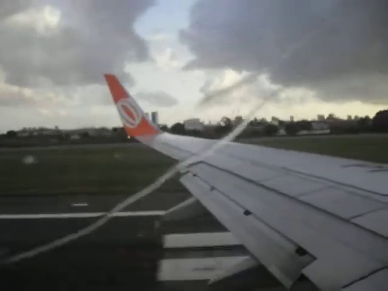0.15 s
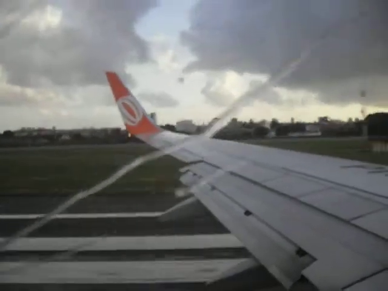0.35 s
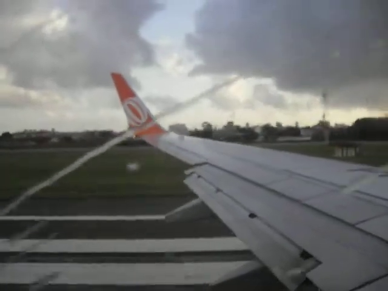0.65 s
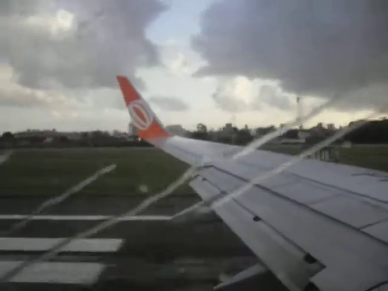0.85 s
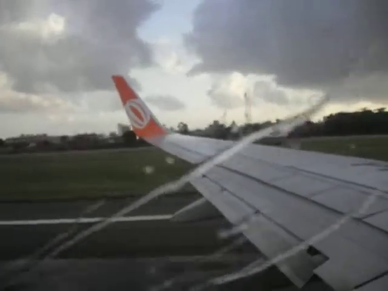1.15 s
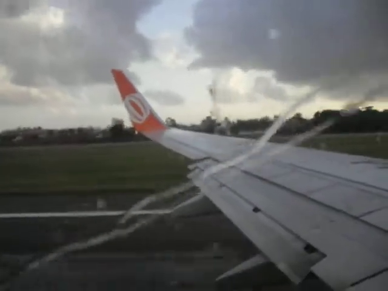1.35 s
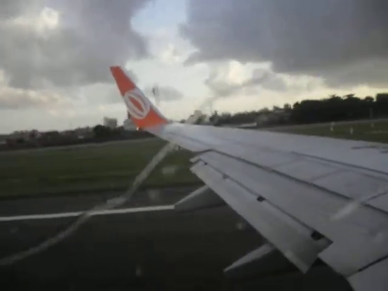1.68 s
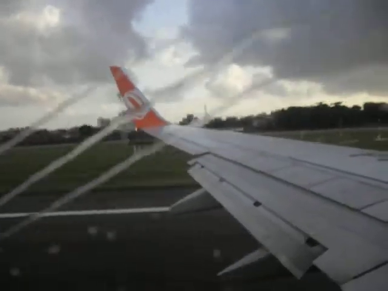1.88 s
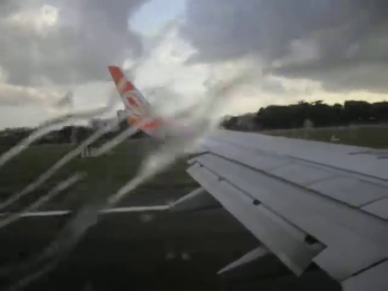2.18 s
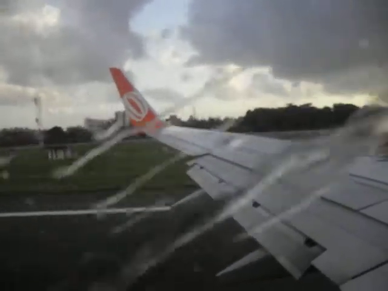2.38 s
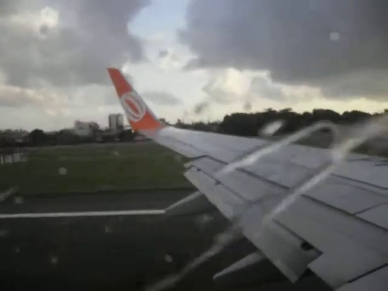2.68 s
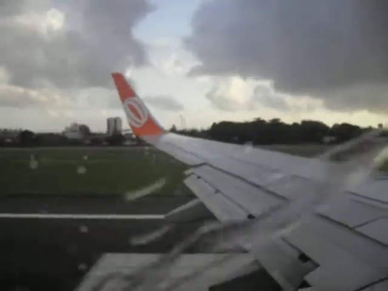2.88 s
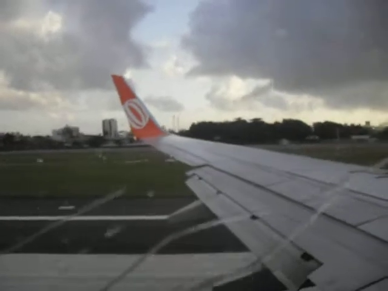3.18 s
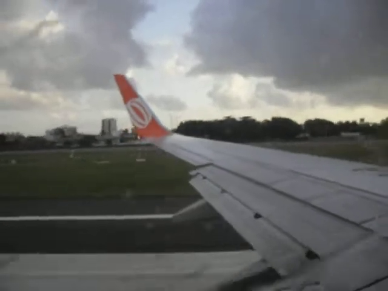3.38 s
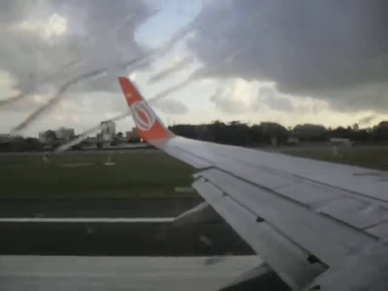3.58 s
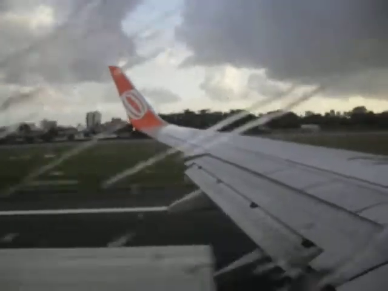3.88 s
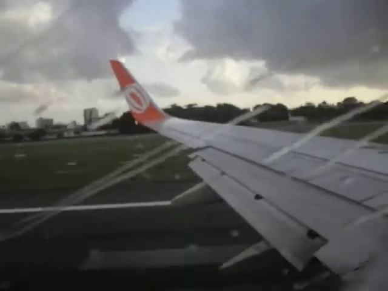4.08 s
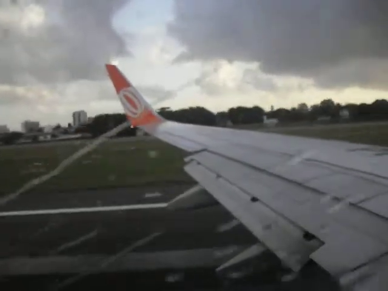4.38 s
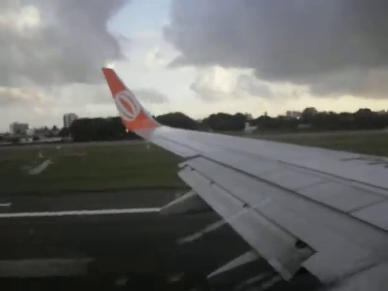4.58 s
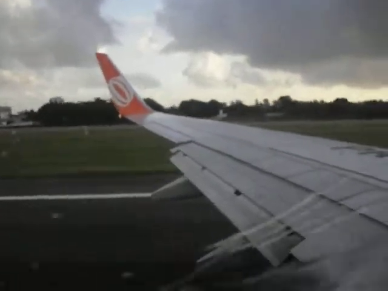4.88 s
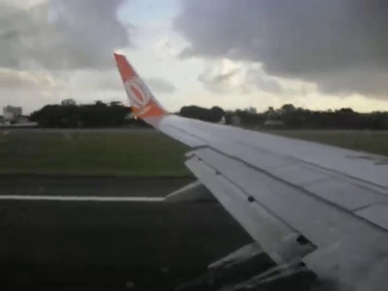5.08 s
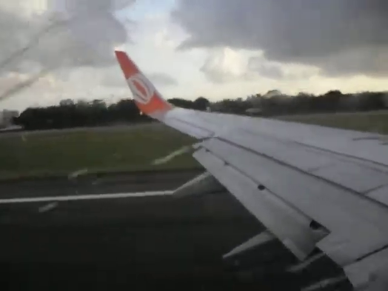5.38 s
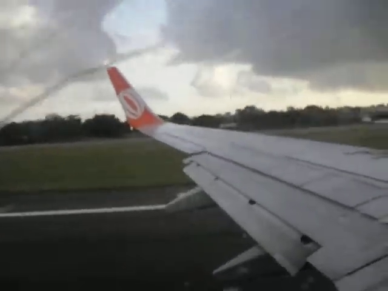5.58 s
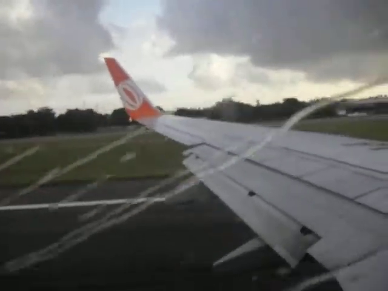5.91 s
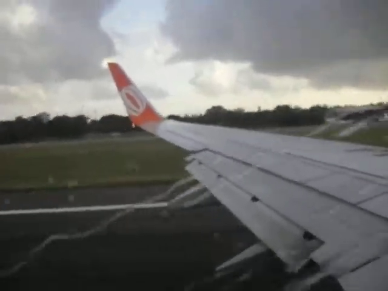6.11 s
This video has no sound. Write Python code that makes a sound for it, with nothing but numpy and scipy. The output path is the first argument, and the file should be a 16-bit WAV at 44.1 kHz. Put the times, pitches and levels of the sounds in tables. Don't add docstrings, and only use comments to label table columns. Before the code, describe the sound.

Jet engines at takeoff thrust roar through an airliner cabin wall, deep, booming and heavily overloaded, crackling as the level surges and dips.

```python
import sys
import numpy as np
from scipy import signal
from scipy.fft import rfft, irfft
from scipy.io import wavfile
from scipy.ndimage import uniform_filter1d

SR = 44100
rng = np.random.default_rng(int(sys.argv[2]) if len(sys.argv) > 2 else 0)


def generate_wav(sig):
    pcm = np.round(np.clip(np.atleast_2d(sig).T, -1, 1) * 32767).astype(np.int16)
    wavfile.write(sys.argv[1], SR, pcm)


def field_ratio(decibels):
    return 10 ** (np.asarray(decibels, dtype=float) / 20)


N = 275625

# f/Hz, spectral density level/dB (per Hz)
ROAR_SPECTRUM = [
    (15, -11),
    (31, -12),
    (90, 1),
    (250, -4.5),
    (350, -9),
    (500, -24.5),
    (800, -38.5),
    (1500, -48),
    (3000, -70),
]
# t/s, level/dB (swing)
GUSTS = [(0.17, 7.5), (0.42, 9.5), (0.57, 4), (1.0, 2.5), (1.119, 10), (1.268, 14), (1.382, 15.5),
         (1.53, 7.5), (1.76, 5), (1.93, 7), (2.031, 8.5), (2.25, 8), (2.46, 12), (2.78, 5), (2.929, 5.5),
         (3.25, 5.5), (3.37, 5), (3.52, 10.5), (3.87, 6), (3.96, 5.5), (4.06, 4.5), (4.331, 13.5),
         (4.508, 9), (4.62, 4), (4.902, 6.5), (5.17, 7.5), (5.6, 3.5), (5.74, 8), (6.06, 3.5), (6.21, 1)]
# t/s, level/dB (swing)
LULLS = [(0.31, -13.5), (1.06, -2.5), (2.602, -15.5), (2.88, -1), (3.17, -2.5), (3.45, -12.5), (3.78, -6),
         (3.91, -4), (4.261, -11), (4.43, -5.5), (4.562, -8), (4.7, -5.5), (4.97, -5), (5.36, -3.5),
         (5.52, -3.5), (5.7, -6.5), (5.84, -2.5), (5.999, -13.5), (6.13, -11)]
# f/Hz, width/Hz, level/dB
BOOM_MODES = [
    (110.16, 28, -3.5),
    (159.35, 20, -1),
    (178.42, 23.64, -3),
    (218.93, 26.8, -4.5),
]
# f/Hz, width/Hz, level/dB
SHUDDER_MODES = [
    (47.66, 20, -1.5),
    (68.27, 25, -3.5),
    (38.75, 12, -9.5),
]
# t/s, level/dB (swing), length/s
JOLTS = [(0.0, 9, 0.058), (0.07, -3.5, 0.12), (0.31, 4, 0.11), (0.64, 4, 0.089), (0.79, -2, 0.07),
         (0.96, -7.5, 0.076), (1.1, 2.5, .12), (1.46, -6, .1), (1.62, -0.5, 0.082), (1.74, -7.5, .1),
         (2.15, 5, 0.085), (2.36, -6.5, 0.081), (2.46, -3.5, 0.027), (2.62, 2.5, 0.087), (2.77, 3.5, 0.088),
         (2.92, -6.5, 0.18), (3.12, -10.5, 0.045), (3.21, 4.5, .07), (3.42, 5.5, 0.056), (3.66, -6, .08),
         (4.19, -9.5, 0.083), (4.39, 8, .1), (4.79, 2.5, 0.077), (4.87, -6.5, .06), (4.98, -5, .06),
         (5.07, 3, .08), (5.21, -7, 0.056), (5.48, 3.5, 0.12), (5.78, 6, 0.063), (6.19, -2.5, 0.056)]
# f/Hz, spectral density level/dB (per Hz)
HISS_SPECTRUM = [
    (500, -2.5),
    (1500, 16),
    (4000, 3.5),
    (9000, -6.5),
    (16000, -8),
    (20000, -29),
]

ROAR_DB, BOOM_DB, SHUDDER_DB, HISS_DB = -5, -3, -2.5, -43.5
GUST_S, LULL_S = 0.046, 0.05
FADE_DB_PER_S = -0.37
BOOM_PER_GUST, BOOM_PER_JOLT = 0.25, -0.19

CEILING = np.sqrt(0.5)
HOLD_S, EASE_S = 0.00019, 0.00004
SOAK = 0.21
SETTLE_DB, SETTLE_S = -29.5, 0.0011
EDGE_HZ, TOP_HZ = 15900, 16650
TOP_GATE_DB, TOP_DB = -0.6, -3


def roar():
    level_db = ROAR_DB + 0.19 * surge_db()
    return field_ratio(level_db) * steadied(coloured(ROAR_SPECTRUM), 0.025, 0.45)


def boom():
    level_db = BOOM_DB + 0.8 * boom_swing_db() + 0.12 * surge_db()
    return field_ratio(level_db) * steadied(ringing(BOOM_MODES), 0.034, 0.7)


def shudder():
    level_db = SHUDDER_DB + 1.1 * centred(swells(JOLTS))
    return field_ratio(level_db) * steadied(ringing(SHUDDER_MODES), 0.05, 0.82)


def vents():
    return field_ratio(HISS_DB) * coloured(HISS_SPECTRUM)


def gust_db():
    gusts = [(*row, GUST_S) for row in GUSTS]
    lulls = [(*row, LULL_S) for row in LULLS]
    return swells(gusts + lulls)


def surge_db():
    return centred(gust_db() + FADE_DB_PER_S * np.arange(N) / SR)


def boom_swing_db():
    return centred(BOOM_PER_GUST * gust_db() + BOOM_PER_JOLT * swells(JOLTS))


def centred(level_db):
    return level_db - level_db.mean()


def swells(rows):
    t = np.arange(0, N + 64, 64) / SR
    level = np.zeros(len(t))
    for centre, db, length in rows:
        level += db * np.exp(-4 * np.log(2) * ((t - centre) / length) ** 2)
    return np.interp(np.arange(N) / SR, t, level)


def coloured(points):
    hz = np.fft.rfftfreq(N, 1 / SR)
    f, db = np.transpose(points)
    shape = field_ratio(np.interp(np.log(hz + 1), np.log(f + 1), db, left=-60, right=-100))
    return evened(irfft(rfft(rng.standard_normal(N)) * shape, N))


def ringing(modes):
    hz = np.fft.rfftfreq(N, 1 / SR)
    out = np.zeros(len(hz), complex)
    for f, width, db in modes:
        drive = rfft(rng.standard_normal(N)) / np.sqrt(width)
        out += field_ratio(db) * drive / (1 + 2j * (hz - f) / width) ** 2
    return evened(irfft(out, N))


def steadied(x, seconds, share):
    size = round(seconds * SR)
    power = uniform_filter1d(uniform_filter1d(x ** 2, size), size)
    return evened(x / (abs(power) + 1e-4) ** (share / 2))


def evened(x):
    return x / np.sqrt(np.mean(x ** 2) + 1e-20)


def stick(x):
    over = np.maximum(abs(x) - CEILING, 0)
    edges = np.diff(np.r_[0, over > 0, 0])
    starts, ends = np.flatnonzero(edges > 0), np.flatnonzero(edges < 0)
    longest = HOLD_S * SR * field_ratio(1.35 * rng.standard_normal(N + 1))
    longest[:N] *= field_ratio(0.18 * surge_db())
    out = np.clip(x, -CEILING, CEILING)
    snaps = np.zeros(N + 99)
    for start, end in zip(starts, ends):
        charge = SOAK * over[start:end].sum()
        hold = max(min(charge, longest[end], N - 1 - end), 0)
        last = end + int(np.ceil(hold))
        rail = np.sign(x[start]) * CEILING
        freed = np.exp((np.arange(end, last) - end - hold) / (EASE_S * SR))
        snaps[last] = abs(rail - out[last - 1])
        out[end:last] = rail + freed * (out[end:last] - rail)
    fizz = signal.lfilter([1], [1, -np.exp(-1 / (SETTLE_S * SR))], snaps[:N])
    return out + field_ratio(SETTLE_DB) * fizz * rng.standard_normal(N)


def band_limit(x):
    low = low_passed(x, EDGE_HZ, size=1023)
    top = low_passed(x, TOP_HZ, size=161) - low
    power = uniform_filter1d(top ** 2, size=3500)
    lively = power > uniform_filter1d(power, size=SR) * field_ratio(2 * TOP_GATE_DB)
    gate = uniform_filter1d(1.0 * lively, size=300)
    return low + field_ratio(TOP_DB) * top * gate


def low_passed(x, hz, size):
    taps = signal.firwin(size, hz, window=("kaiser", 7), fs=SR)
    return signal.oaconvolve(np.pad(x, len(taps) // 2, "reflect"), taps, "valid")


def scene():
    return (roar() + boom() + shudder() + vents())[None]


def roll_off(x):
    return signal.sosfilt(signal.butter(12, 17200, fs=SR, output="sos"), x)


def record(dry):
    ripple = field_ratio(-43) * coloured([(30, 34), (200, -19), (700, 1), (2000, -16), (6000, -53)])
    flat = np.clip(stick(dry[0]) + ripple, -CEILING, CEILING)
    flat *= np.minimum(np.arange(N, 0, -1) / 60, 1)
    return roll_off(band_limit(flat)[None])


dry = scene()
out = record(dry)
generate_wav(out)
```